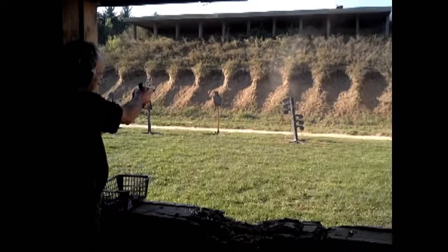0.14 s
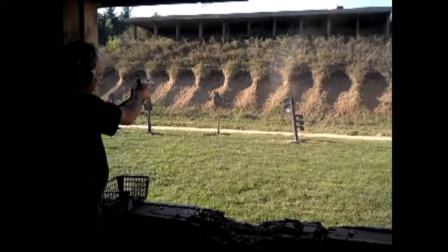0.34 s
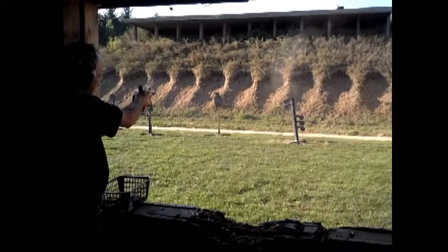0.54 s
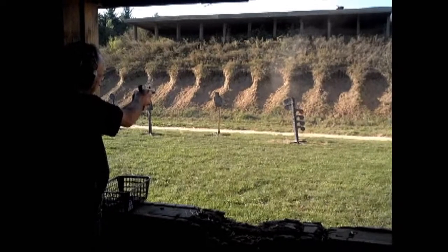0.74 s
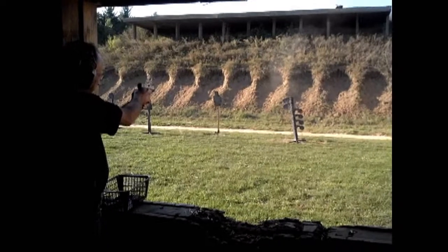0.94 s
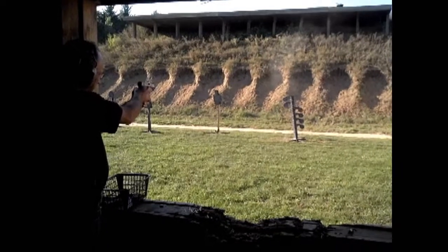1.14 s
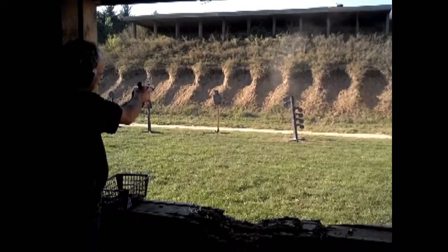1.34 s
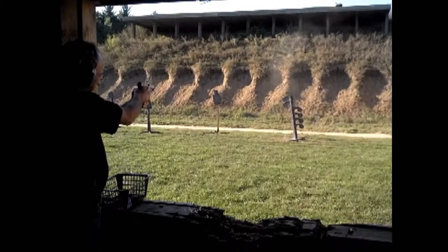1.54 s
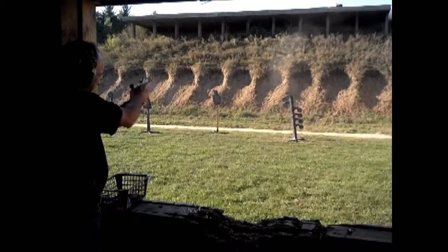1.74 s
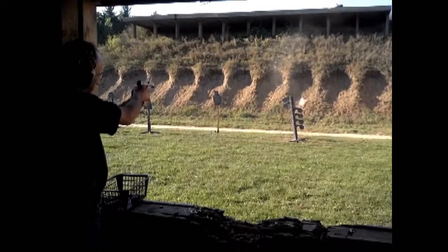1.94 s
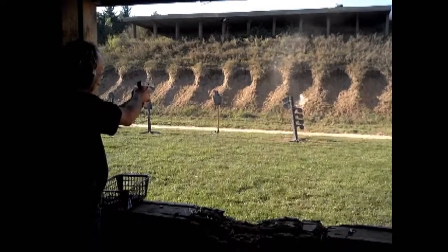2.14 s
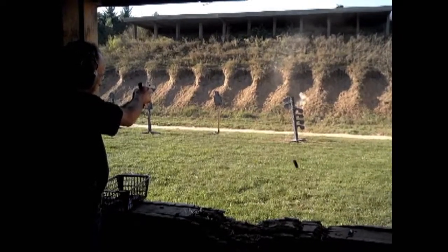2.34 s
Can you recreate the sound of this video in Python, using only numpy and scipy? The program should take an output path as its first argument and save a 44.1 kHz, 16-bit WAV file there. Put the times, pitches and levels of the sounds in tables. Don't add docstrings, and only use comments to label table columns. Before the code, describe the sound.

Pistol gunfire under a roofed firing line: a quick farther-then-near pair, a lone farther shot, then near and farther again. Bullets clink on steel; low valley booms and faint distant reports fill the quiet open air.

```python
import sys
import numpy as np
from scipy import signal
from scipy.io import wavfile
from scipy.ndimage import uniform_filter1d

SR = 44100
rng = np.random.default_rng(int(sys.argv[2]) if len(sys.argv) > 2 else 0)


def wrap_up_sound(samples):
    columns = np.atleast_2d(samples).T
    tamed = np.clip(columns, -1, 1)
    steps = np.round(tamed * 32767).astype(np.int16)
    wavfile.write(sys.argv[1], SR, steps)


def natural_amplitude(level_db):
    exponent = np.asarray(level_db, float) / 20
    return 10 ** exponent


N = 110250


def at_hz(rows, hz):
    rows = np.array(rows, float)
    return [np.interp(np.log(hz), np.log(rows[:, 0]), column) for column in rows.T[1:]]


def bands():
    edges = 40 * 2 ** np.arange(0, 9.1, .5)
    filters = []
    for low, high in zip(edges, edges[1:]):
        sos = signal.butter(2, [low, min(high, .45 * SR)], "band", fs=SR, output="sos")
        filters.append((np.sqrt(low * high), sos))
    return filters


def fall(t, t60):
    return natural_amplitude(-60 * np.maximum(t, 0) / max(t60, .005))


def lumps(shape, size):
    slow = uniform_filter1d(rng.standard_normal(shape), size=size, axis=-1)
    return slow / slow.std()


def add(out, x, s):
    i = int(s * SR)
    out[:, i:i + x.shape[1]] += x[:, :N - i]


def resonance(x, hz, width_hz):
    r = np.exp(-np.pi * width_hz / SR)
    return signal.lfilter([(1 - r * r) / 2, 0, (r * r - 1) / 2], [1, -2 * r * np.cos(2 * np.pi * hz / SR), r * r], x)


DUCK_DB, RECOVER_DB_PER_S = -7.5, 6


def ducking():
    t = np.arange(N) / SR
    earlier_shot = [(-0.56, 0)]
    since = [np.where(t > s, t - s, 9) for s, _ in earlier_shot + NEAR_SHOTS + FAR_SHOTS]
    return natural_amplitude(np.minimum(DUCK_DB + RECOVER_DB_PER_S * np.min(since, axis=0), 0))


# pitch_hz, density_db (dB per Hz)
AIR_SPECTRUM = [(40, -13.5), (150, 8), (700, -3), (2000, -13), (4500, -19.5), (8000, -39), (15000, -48.5)]
AIR_DB, WIND_DB, WIND_HZ = -54, -66.5, 150


def air():
    white, hush = rng.standard_normal((2, 2, N)), 0
    for k, (hz, sos) in enumerate(bands()):
        patches_db = 1.5 * lumps(N, size=3000)
        hush = hush + natural_amplitude(at_hz(AIR_SPECTRUM, hz)[0] + patches_db) * signal.sosfilt(sos, white[k % 2])
    wind = resonance(rng.standard_normal(N), WIND_HZ, 60.)
    wind = wind / wind.std() * [[.3], [1]]
    return natural_amplitude(AIR_DB) * hush / hush.std() + natural_amplitude(WIND_DB) * wind


# start_s, level_db, pitch_hz, t60_s
VALLEY_BOOMS = [
    (.025, -54, 2090, 0.22),
    (0.659, -39, 155, 0.84),
    (0.879, -44.5, 155, 0.78),
    (1.668, -51, 139, .25),
    (2.339, -40.5, 150, 0.7),
]


def booms():
    out, t = np.zeros((2, N)), np.arange(SR) / SR
    for s, db, hz, t60 in VALLEY_BOOMS:
        swell = resonance(rng.standard_normal((2, SR)), hz, hz / 5)
        envelope = np.minimum(t * hz / 4, 1) * fall(t, t60)
        add(out, natural_amplitude(db) * swell / swell.std() * envelope * [[1], [.4]], s)
    return out


# start_s, level_db, rise_s, t60_s, cut_hz
DISTANT_REPORTS = [
    (0.026, -59, 0.0072, 0.17, 6000),
    (.805, -42, 0.038, 0.26, 5350),
    (1.03, -50.5, 0.033, 1.0, 1200),
    (1.56, -55, 0.0051, .15, 1000),
    (2.14, -58, .002, .08, 9000),
]


def distant():
    out, t = np.zeros((2, N)), np.arange(SR) / SR
    for s, db, rise_s, t60, cut_hz in DISTANT_REPORTS:
        sos = signal.butter(1, [300, cut_hz], "band", fs=SR, output="sos")
        puff = signal.sosfilt(sos, signal.lfilter([1], [1, -.8], rng.standard_normal((2, SR))))
        add(out, natural_amplitude(db) * puff / puff.std() * np.minimum(t / rise_s, 1) * fall(t - rise_s, t60), s)
    return out


# start_s, level_db
FAR_SHOTS = [(0.222, -22.5), (1.2195, -22), (2.179, -22)]
NEAR_SHOTS = [(0.383, -14), (1.855, -14.5)]
# pitch_hz, density_db (dB per Hz), hold_s, t60_s
FAR_SCATTER = [(60, -8.5, .015, .25), (150, -5.5, .02, 0.56), (260, 4, 0.024, 0.39), (650, 1, 0.014, 0.43),
               (2000, -6, .01, 0.45), (4500, -13.5, .01, 0.35), (9000, -19.5, .01, 0.32),
               (14800, -24, 0.004, 0.28)]
NEAR_SCATTER = [(60, -9.5, 0.063, .35), (170, -7.5, .055, 0.7), (300, 0, 0.059, 0.63),
                (677, -2.5, 0.062, 0.43), (1740, -6.5, 0.044, 0.36), (4500, -16.5, 0.011, 0.39),
                (9000, -24.5, 0.015, 0.32), (15000, -23, 0.0067, 0.33)]
# start_s, t60_s after it, valley tail level_db, tail t60_s, tail cut_hz
FAR_BANK = (.19, 0.46, -32, 1.5, 4001)
NEAR_BANK = (.22, .33, -33, 2.72, 4003)
# delay_s, level_db, pitch_hz, width_hz
FAR_ECHOES = [(0, 19.5, 2310, 1200), (.001, 4.5, 3700, 1500), (.001, 1, 118, 120), (.0012, 9.5, 347, 300),
              (.003, -0.5, 716, 406), (.009, -4.5, 785, 493), (.1405, -5, 1200, 518),
              (.143, -8.5, 840, 503), (.168, -4.5, 1000, 600), (.171, -4.5, 550, 300)]
NEAR_ECHOES = [
    (0, -3.5, 3080, 3000),
    (.025, 0.5, 1200, 900),
    (.2, -17, 1000, 900),
]
# pitch_hz, width_hz, level_db
SHELTER = [(155, 22, -4.5), (319.2, 37.6, -0.5), (727, 90, -4), (1287, 72, -13.5)]
# pitch_hz, side_over_mid_db
SCATTER_SIDE = [(60, -5), (130, -9.5), (260, -9.5), (500, -7.5), (2000, 2), (6000, -0.5), (15000, 1.5)]
BLAST_MS, RISE_S = .4, 0.0002
SAME_PATH = 0.87
LUMPY_DB, SWELL_DB_PER_S = 2.5, 68.5


def gun(shots, scatter, bank, echoes):
    t = np.arange(SR) / SR
    bank_s, after_s, tail_db, tail_s, tail_hz = bank
    same = np.clip(SAME_PATH, 0, 1)
    shared = rng.standard_normal((2, 1, 2, SR))
    own = rng.standard_normal((2, len(shots), 2, SR))
    white = same * shared + np.sqrt(1 - same ** 2) * own
    white = white * (1 - np.exp(-t / RISE_S))
    tail = natural_amplitude(tail_db) * fall(t, tail_s)

    body, power = 0, 0
    for k, (hz, sos) in enumerate(bands()):
        db, hold_s, t60 = at_hz(scatter, hz)
        shape = natural_amplitude(-SWELL_DB_PER_S * np.maximum(hold_s - t, 0))
        shape = shape * fall(t - hold_s, t60) * fall(t - bank_s, after_s)
        shape = shape + tail / (1 + (hz / tail_hz) ** 2)
        shape = shape * natural_amplitude(db + LUMPY_DB * lumps(SR, size=200))
        shape = shape * natural_amplitude([[0], at_hz(SCATTER_SIDE, hz)])
        body = body + signal.sosfilt(sos, white[k % 2] * shape)
        power = power + natural_amplitude(2 * db) * hz * 0.57 / SR
    body = body / np.sqrt(power)
    body = body + sum(natural_amplitude(db) * resonance(body, hz, width_hz) for hz, width_hz, db in SHELTER)

    n_wave = np.where(t < BLAST_MS / 1000, 1 - 2000 * t / BLAST_MS, 0) + 1e-18
    for delay_s, db, hz, width_hz in echoes:
        pulse = resonance(resonance(n_wave, hz, width_hz), hz, width_hz)
        pulse = np.roll(pulse, int(delay_s * SR)) / abs(pulse).max()
        body = body + pulse * natural_amplitude(db - 2) * [[1], [rng.choice([-.7, .7])]]

    out = np.zeros((2, N))
    for (s, db), sound in zip(shots, body):
        add(out, natural_amplitude(db) * sound, s)
    return out


# start_s, ring level_db, splash level_db, splash t60_s
HITS = [
    (.454, -20.5, -30.5, 0.18),
    (0.69, -41.5, -63, 0.12),
    (.815, -49, -70, .25),
    (.291, -38.5, -50, .1),
    (1.2876, -36.5, -45, 0.12),
    (2.249, -42, -51, .1),
    (1.937, -45, -58, 0.086),
]
SWING_HZ = [2062, 3526, 3935, 4317, 5560, 6272, 7838, 9749, 12855, 13100, 13900]
STOP_HZ = [2078, 2280, 3548, 4350, 6745, 7908, 12974, 13900]
SETTLE_HZ = [1260, 1780, 2080, 2500, 3560, 4450, 6280]
FAR_HZ = [3499, 4296, 6592, 7330, 7840, 12015, 12775]
# level_db, t60_s
SWING = [(-16, .5), (-16, .3), (-20, .2), (0, .3), (-14, .2), (-20, .16), (-6, .4), (-24, .12), (-22, .3),
         (-12, .1), (-28, .4)]
STOP = [(1, 0.32), (-3, 0.32), (-11, .6), (0.5, 0.63), (-24, 0.35), (-3.5, 0.68), (-25, .4), (-22, .5)]
SETTLE = [(-4, 0.22), (-1, 0.43), (7, 0.27), (6.5, 0.18), (-8, .2), (4.5, 0.16), (-13, 0.41)]
FAR_1 = [(7, .25), (2.5, .5), (-22.5, .3), (-21.5, 0.19), (-21, .3), (-25, .3), (-28.5, 0.46)]
FAR_2 = [(2, .3), (-14, .4), (-12, .3), (-3, .3), (-22, .45), (-17, .27), (-3, .4)]
FAR_3 = [(0, 0.49), (-5.5, 0.62), (-20, 0.33), (-4.5, .42), (-4, 0.52), (-9, 0.33), (-18, 0.29)]
GRAZE = [(-32, .2), (-20, .2), (-20, .2), (-20, .2), (-22, 0.27), (-20, .2), (2.5, 0.38)]
SHUDDER_S, PLATE_SIDE_DB, WOBBLE_DB = 0.0085, 0, 3


def steel():
    out, t = np.zeros((2, N)), np.arange(SR) / SR
    plates = [(SWING_HZ, SWING), (STOP_HZ, STOP), (SETTLE_HZ, SETTLE),
              (FAR_HZ, FAR_1), (FAR_HZ, FAR_2), (FAR_HZ, FAR_3), (FAR_HZ, GRAZE)]
    for (s, db, splash_db, splash_t60), (pitches, levels) in zip(HITS, plates):
        splash = np.diff(rng.standard_normal((2, SR + 1))) * fall(t, splash_t60)
        sound = natural_amplitude(splash_db - db) * splash
        for hz, (level_db, t60) in zip(pitches, levels):
            r, w = natural_amplitude(-60 / (t60 * SR)), 2 * np.pi * hz / SR
            shake = rng.standard_normal((2, SR)) * np.exp(-t / SHUDDER_S) + 1e-18
            mode = signal.lfilter([0, 1], [1, -2 * r * np.cos(w), r * r], shake)
            mode = mode / abs(mode).max(axis=1, keepdims=True)
            sound = sound + natural_amplitude(level_db + WOBBLE_DB * lumps((2, SR), size=900)) * mode
        add(out, natural_amplitude(db) * sound * natural_amplitude([[0], [PLATE_SIDE_DB]]), s)
    return out


SAG_DB, SAG_S = -30.5, .04


def pressure_sag():
    out, t = np.zeros((2, N)), np.arange(SR) / SR
    for s, _ in NEAR_SHOTS:
        add(out, -natural_amplitude(SAG_DB) * t / SAG_S * np.exp(-t / SAG_S) * [[0], [1]], s)
    return out


def scene():
    near_gun = gun(NEAR_SHOTS, NEAR_SCATTER, NEAR_BANK, NEAR_ECHOES)
    far_gun = gun(FAR_SHOTS, FAR_SCATTER, FAR_BANK, FAR_ECHOES)
    background = ducking() * air() + booms() + distant()
    mid, side = (background + near_gun + far_gun + steel() + pressure_sag()) / 2
    return np.array([mid + side, mid - side])


def roll_off(x):
    return signal.sosfilt(signal.butter(12, 16850, fs=SR, output="sos"), x)


CLIP = 0.42
WIDEN, WIDEN_LAG = .975, 16
CUTOFF_HZ = 15750


def record(dry):
    dry = CLIP * np.tanh(dry / CLIP)
    other_side = np.pad(dry[::-1], ((0, 0), (WIDEN_LAG, 0)))[:, :N]
    wide = dry - WIDEN * other_side
    wide = signal.sosfilt(signal.butter(16, 16400, fs=SR, output="sos"), wide)
    mix = signal.sosfilt(signal.cheby2(12, 20, CUTOFF_HZ + 50, fs=SR, output="sos"), wide)
    return roll_off(mix)


dry = scene()
out = record(dry)
wrap_up_sound(out)
```